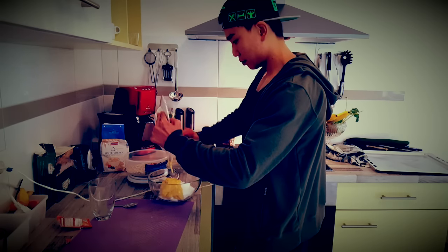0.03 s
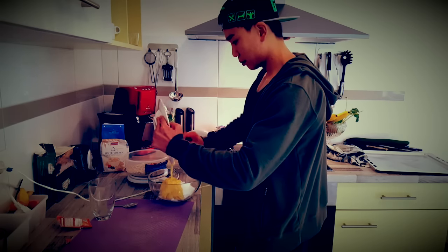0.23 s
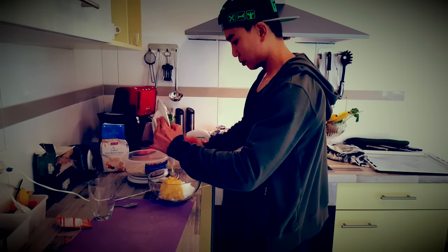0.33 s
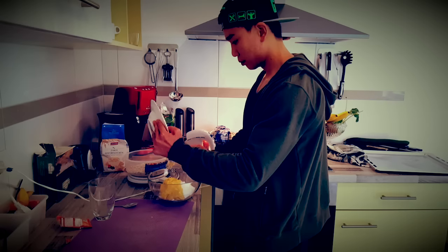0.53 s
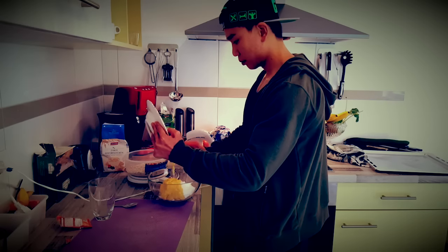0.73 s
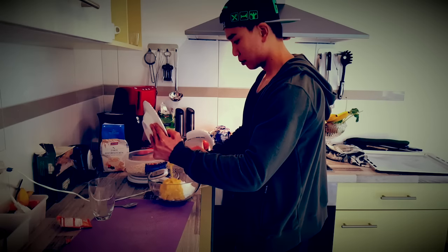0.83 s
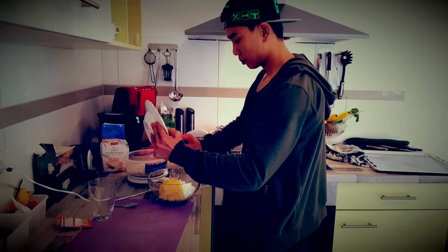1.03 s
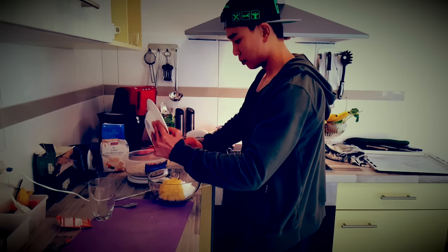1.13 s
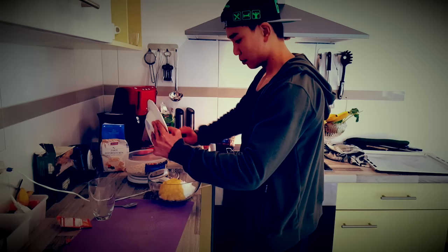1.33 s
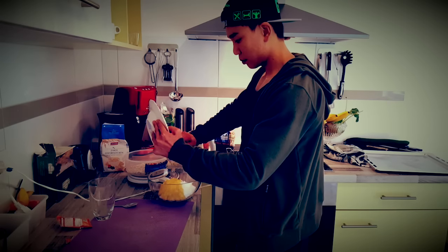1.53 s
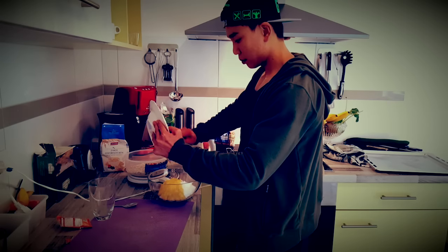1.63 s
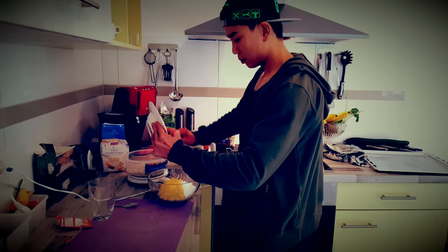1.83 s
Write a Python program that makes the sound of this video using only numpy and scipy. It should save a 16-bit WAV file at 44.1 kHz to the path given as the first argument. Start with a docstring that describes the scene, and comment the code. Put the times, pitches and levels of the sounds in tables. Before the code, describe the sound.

A fork clatters against crockery a few times, ringing briefly above a quiet hum.

```python
"""Cutlery on crockery at a kitchen counter, a metre and a half from a microphone pair in a tiled room.
An appliance hums throughout. A bowl is already ringing faintly at the start, then comes one light clink.
Each contact clicks, knocks and rings a bowl, a plate, a cup, a glass and the fork in its own measure.
The loudest blows follow at 0.2-0.4 s, with a short scrape. The fork clinks and chatters over the dishes
again near 0.8 s and 1.2 s, then softly around 1.5 s, and the ringing dies away into the hum."""
import sys
import numpy as np
from scipy import signal
from scipy.fft import rfft, irfft, next_fast_len
from scipy.io import wavfile
from scipy.ndimage import map_coordinates

SR = 44100
rng = np.random.default_rng(int(sys.argv[2]) if len(sys.argv) > 2 else 0)


def wrap_up_sound(samples):
    """Save the sound to the file named by the first command line argument, as 16-bit audio."""
    columns = np.atleast_2d(samples).T
    # keep every value between -1 and 1, then stretch to whole-number steps
    tamed = np.clip(columns, -1, 1)
    steps = np.round(tamed * 32767).astype(np.int16)
    wavfile.write(sys.argv[1], SR, steps)


N = 83790


def amp(db):
    return 10 ** (np.asarray(db) / 20)


def unit(x):
    return x / np.sqrt(np.mean(x ** 2) + 1e-20)


def burst(x):
    """Each channel gets the energy of a hundredth of a second at rms 1."""
    return x * np.sqrt(SR / 100 / np.sum(np.abs(x) ** 2, axis=-1, keepdims=True))


def along(points, hz):
    """Read (f/Hz, value) points at hz on a log frequency axis."""
    f, values = np.transpose(points)
    return np.interp(np.log(hz + 1), np.log(f + 1), values)


def wobble(rate):
    """A smooth random curve, rate knots a second."""
    return map_coordinates(rng.standard_normal(4000), [np.arange(N) * rate / SR])


def coloured(x, points, tilt_db=0):
    """x through a minimum-phase filter with the given colour and tilt per octave."""
    size = 2048
    hz = np.fft.rfftfreq(size, 1 / SR)
    gain = amp(along(points, hz) + tilt_db * np.log2((hz + 1) / 4000))
    cepstrum = irfft(np.log(gain))
    cepstrum[1:size // 2] *= 2
    cepstrum[size // 2 + 1:] = 0
    impulse = irfft(np.exp(rfft(cepstrum)))
    return signal.fftconvolve(x, impulse[None], axes=1)[:, :x.shape[1]]


def add(out, s, x, pan_db):
    """Mix x into out at time s, pan_db louder on the left than on the right."""
    i = round(s * SR)
    out[:, i:i + x.shape[1]] += x[:, :N - i] * amp([[pan_db / 2], [-pan_db / 2]])


def room_tone():
    """The kitchen's low, steady noise, least alike at the two microphones in the treble."""
    # noise colour (f/Hz, level/dB)
    colour = [(20, -17.5), (35, -13), (50, -5.5), (75, -2.5), (140, -5.5), (220, -10), (380, -6.5),
              (600, -13.5), (1000, -25.5), (2000, -26.5), (5000, -37.5), (10000, -47), (15000, -43.5)]
    # likeness of left and right (f/Hz, correlation)
    alike = [(50, 0.84), (150, .3), (400, 0.63), (1000, .2), (8000, 0.08)]
    hz = np.fft.rfftfreq(N, 1 / SR)
    angle = np.arccos(along(alike, hz)) / 2
    spectrum = rfft(rng.standard_normal((2, N))) * amp(along(colour, hz))
    mid, side = irfft(spectrum * [np.cos(angle), np.sin(angle)], N)
    return amp(-51.5) * unit(np.array([mid + side, mid - side]))


def appliance_hum():
    """An appliance hums on a few low, slightly unsteady tones."""
    # hum tones (f/Hz, level/dB)
    tones = [(49, -62.5), (100, -62), (145, -61), (362, -64)]
    t = np.arange(N) / SR
    return sum(amp(db) * np.sqrt(2) * np.sin(2 * np.pi * hz * t + .91 * wobble(5.2)) for hz, db in tones)


def kitchen(x):
    """One second of x at the pair: direct sound, nearby counter and cupboards, then the room's tail."""
    # reverberation of the tiled room (f/Hz, t60/s)
    decay = [(150, 0.85), (800, 0.62), (2500, 0.55), (5000, 0.57), (9000, 0.48), (14000, 0.35)]
    near_db, near_t60_s, tail_db, tail_rise_s = 6, .07, 3.5, .0079
    t = np.arange(SR) / SR
    hz, when, noise = signal.stft(rng.standard_normal((2, SR)), SR, nperseg=256)
    fading = noise * amp(-60 * when / along(decay, hz)[:, None])
    tail = signal.istft(fading, SR, nperseg=256)[1][:, :SR] * (1 - np.exp(-t / tail_rise_s))
    near = rng.standard_normal((2, SR)) ** 3 * amp(-60 * t / near_t60_s) * (t > .001)
    paths = burst(1. * (t == 0)) + amp(near_db) * burst(near) + amp(tail_db) * burst(tail)
    return signal.fftconvolve(np.atleast_2d(x), paths, axes=1)[:, :SR]


def contact(colour, tilt_db=0):
    """Cutlery meets a dish: a crack a few milliseconds long, heard across the room."""
    t60_s, alike = .006, .59
    t = np.arange(SR // 20) / SR
    common = np.sqrt(alike) * rng.standard_normal(len(t))
    apart = np.sqrt(1 - alike) * rng.standard_normal((2, len(t)))
    crack = (common + apart) * amp(-60 * t / t60_s)
    return burst(coloured(kitchen(crack), colour, tilt_db))


def shares(modes):
    """Each mode's share of an object's ring at the left and right microphone."""
    _, db, _, pan_db = np.transpose(modes)
    gains = amp(db[:, None] + pan_db[:, None] * [.5, -.5])
    return gains * np.sqrt(2) / np.linalg.norm(gains)


def damped_ring(modes):
    """The brief rattle while the fork still touches, damping and blurring each mode."""
    loss_factor = 33.3 / 2640  # bandwidth over pitch
    t = np.arange(SR // 30) / SR
    cycles = np.transpose(modes)[0][:, None] * t
    tones = np.sin(2 * np.pi * cycles) * np.exp(-np.pi * cycles * loss_factor)
    return shares(modes).T @ burst(tones)


def free_ring(modes):
    """An object's modes fading in the room, as complex tones so that each blow can set their phase."""
    t = np.arange(SR) / SR
    tones = [burst(kitchen(np.exp(2j * np.pi * hz * t) * amp(-60 * t / t60))) for hz, _, t60, _ in modes]
    return np.sqrt(2) * np.array(tones) * shares(modes)[:, :, None]


def clinks():
    """Each blow clicks, knocks and sets the dishes and the fork rattling and ringing."""
    # the bowl's faint opening ring, then the contacts (t/s, click/dB, click tilt/dB per octave,
    # knock/dB, bowl/dB, plate/dB, cup/dB, glass/dB, handle/dB, tines/dB, left-right/dB)
    events = [(.0020, -53.5, 0, -66.5, -48.5, -83, -78, -56, -72, -75, 1),
              (0.0359, -35.5, -4, -47.5, -39.5, -45, -45, -35.5, -39, -28.5, 0),
              (.2220, -27, 6.5, -25, -28, -10.5, -30.5, -17.5, -23.5, -38.5, 0.5),
              (.2305, -16.5, -4.5, -26, -20, -13.5, -20.5, -21, -36, -39.5, -1.5),
              (.3370, -31, -4, -50.5, -45, -27.5, -55, -27, -61, -62, -2),
              (.3890, -20, -2, -21, -22, -25.5, -17.5, -14.5, -26.5, -28.5, -2),
              (.4020, -36, -13, -25.5, -35, -26.5, -34, -19, -36, -40, 4.5),
              (.4560, -41, 6, -44, -41, -30.5, -41.5, -31.5, -37, -52, -3),
              (.7685, -29, 4, -35, -21.5, -27.5, -38.5, -40, -30, -32, 2),
              (.8465, -47, 4, -41.5, -37.5, -48, -37.5, -42.5, -46, -50.5, 6.5),
              (.9095, -34.5, 1.5, -40, -38, -36, -43, -42.5, -46, -50, -0.5),
              (1.169, -29.5, 3, -27, -28.5, -42, -20.5, -31.5, -31.5, -41.5, 1.5),
              (1.1739, -34, -4, -29, -34, -41, -25.5, -28.5, -30.5, -35.5, 1.5),
              (1.2370, -31.5, 7, -47.5, -44.5, -44.5, -42, -43.5, -30.5, -50, -3),
              (1.4770, -52.5, 7, -57, -42, -62.5, -66.5, -57, -71, -53, 3.5),
              (1.5718, -43.5, -6, -55.5, -52.5, -45.5, -53.5, -59.5, -61.5, -58.5, 2),
              (1.5890, -39.5, -5.5, -47.5, -42, -41, -51, -46, -60, -46.5, -1.5)]
    # modes of the dishes and of the fork's two ends (f/Hz, level/dB, t60/s, left-right/dB)
    bowl = [(2023, 9.5, 0.22, -7.5), (2000, -6, 0.38, 2), (2660, -10.5, .08, 2), (3270, -13, .15, 2),
            (4500, -14.5, .25, 3.5)]
    plate = [(2470, -4.5, 0.59, 0), (2590, -6.5, 0.095, 1.5), (2605, -7, 0.13, -4.5), (2633, -2, .14, 4),
             (3170, -8, .06, 0), (3150, 1, 0.067, -6), (5226, 4.5, 0.015, 3), (5340, -17, 0.041, 2),
             (5850, -8, .05, 12.5)]
    cup = [(1088, -9.5, 0.025, -3), (1283.4, -8, 0.1, 2.5), (1965, -7, 0.15, -1.5), (3186, 1, 0.12, 2.5),
           (3860, 0, 0.11, 5)]
    glass = [(3210, -14.5, .45, 0), (3725, 1, 0.62, 1.6), (3814, 5, 0.15, -1.5), (3910, -8, .7, 3),
             (4043, -4.5, 0.1, 5), (5245, -15, 0.14, -4)]
    handle = [(6934, 0.5, 0.021, 2), (8380, -1, 0.0091, 7), (8930, 3.5, 0.024, 3.5), (12800, -8.5, .03, -3)]
    tines = [(10300, -0.5, .01, 0), (10900, 6, 0.036, -3.5), (10720, -5, .015, 0)]
    # colours of the sharp click and the dull knock (f/Hz, level/dB)
    click = [(300, -29), (1500, -11.5), (2400, 1.5), (3400, 3), (4500, 6.5), (5200, 3), (6100, -7),
             (7000, 3.5), (7650, -11.5), (8600, -8), (9700, -5), (11000, -8), (11900, -15.5), (13000, -11),
             (14000, -19.5), (15000, -35)]
    knock = [(70, -34.5), (160, -2), (300, -7), (520, 0.5), (750, -7.5), (1000, -3.5), (1270, -3),
             (1550, -8), (2200, 1), (4500, -4.5), (9000, -41.5)]
    ring_db, spread_db, rattle_db = -4.5, 1, -5.5
    low_cut = signal.butter(2, 681, "high", fs=SR, output="sos")  # the clinks and rings carry no deep bass
    things = [(free_ring(modes), damped_ring(modes)) for modes in (bowl, plate, cup, glass, handle, tines)]
    out = np.zeros((2, N))
    for s, click_db, tilt_db, knock_db, *things_db, pan_db in events:
        ring = rattle = 0
        for (tones, damped), db in zip(things, things_db):
            strength = amp(db + ring_db + spread_db * rng.standard_normal(len(tones)))
            phase = np.exp(2j * np.pi * rng.random(len(tones)))
            ring = ring + np.tensordot(strength * phase, tones, 1).real
            rattle = rattle + amp(db + rattle_db) * damped
        room_rattle = kitchen(rattle)
        room_rattle *= (np.linalg.norm(rattle, axis=1) / np.linalg.norm(room_rattle, axis=1))[:, None]
        bright = signal.sosfilt(low_cut, ring + room_rattle + amp(click_db) * contact(click, tilt_db))
        add(out, s, bright + amp(knock_db) * contact(knock), pan_db)
    return out


def scrapes():
    """The fork sticks and slips in a quick run of tiny ticks; under pressure the dish squeals."""
    # fork strokes (start/s, peak/s, end/s, rasp/dB, tilt/dB per octave, squeal/dB, squeal/Hz)
    strokes = [(0.247, 0.262, .289, -21, 1.5, -18.5, 2614), (0.824, 0.854, 0.94, -36, 2, -64, 3150),
               (0.873, .920, 0.93, -34.5, 2, -44.5, 2002), (1.236, 1.22, 1.258, -27.5, 5, -52, 3100),
               (1.483, 1.544, 1.560, -52.5, 9.5, -52, 2025), (1.554, 1.599, 1.6, -32, -2, -39.5, 4560)]
    # colour of the rasp (f/Hz, level/dB)
    colour = [(300, -21), (800, -29.5), (1100, -4.5), (1500, -20), (2000, 0.5), (2700, 7), (3200, 0),
              (3700, -5.5), (4600, -1), (6000, -12), (7600, -13), (8400, -9.5), (10000, -15.5),
              (13300, -17), (14200, -33), (15000, -37.5)]
    slips_per_s, spread_db, waver = 900, 2, .015
    out, t = np.zeros((2, N)), np.arange(SR) / SR
    for start, peak, end, rasp_db, tilt_db, squeal_db, squeal_hz in strokes:
        pressure = np.interp(start + t, [start, peak, end], [0, 1, 0])
        slips = (rng.random(SR) < slips_per_s / SR) * amp(spread_db * rng.standard_normal(SR))
        slips *= np.sign(rng.standard_normal(SR))
        pitch_hz = squeal_hz * (1 + waver * wobble(140)[:SR])
        tone = np.sin(2 * np.pi * np.cumsum(pitch_hz) / SR)
        rasp = amp(rasp_db) * unit(coloured(kitchen(slips * pressure), colour, tilt_db))
        squeal = amp(squeal_db) * unit(kitchen(tone * pressure))
        add(out, start, (rasp + squeal) * np.sqrt(np.mean(pressure ** 2)), pan_db=1)
    return out


def scene():
    """Clinks and scrapes at the counter, over room tone and hum that sit a little to the left."""
    return clinks() + scrapes() + (room_tone() + appliance_hum()) * amp([[.7], [-.7]])


def record(dry):
    """The two close microphones hear nearly the same bass, roll off the top and lean slightly left."""
    # treble response of the pair (f/Hz, gain/dB)
    response = [(11200, -0.5), (11900, -5.5), (13100, -1.5), (14000, -10.5), (15000, -11)]
    bass_mono_hz, top_hz = 450, 15100
    size = next_fast_len(N + SR // 4)
    hz = np.fft.rfftfreq(size, 1 / SR)
    spectrum = rfft(dry, size) * amp(along(response, hz)) * (hz < top_hz)
    mid = spectrum.mean(axis=0)
    width = np.sqrt((hz ** 2 + .12 * bass_mono_hz ** 2) / (hz ** 2 + bass_mono_hz ** 2))
    return irfft(mid + (spectrum - mid) * width, size)[:, :N] * amp([[.4], [-.4]])


dry = scene()
out = record(dry)
wrap_up_sound(out)
```